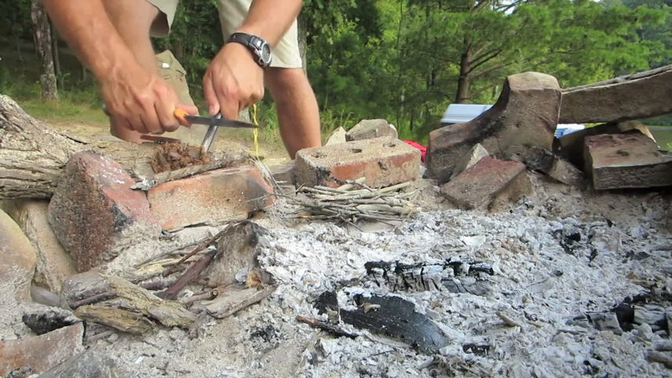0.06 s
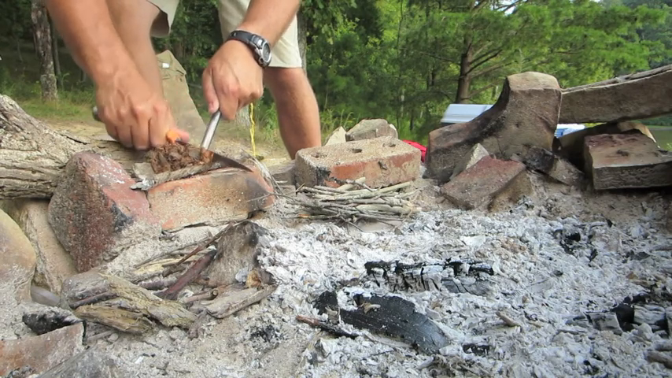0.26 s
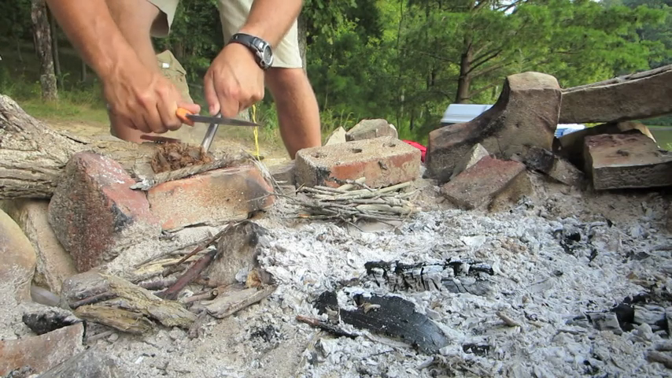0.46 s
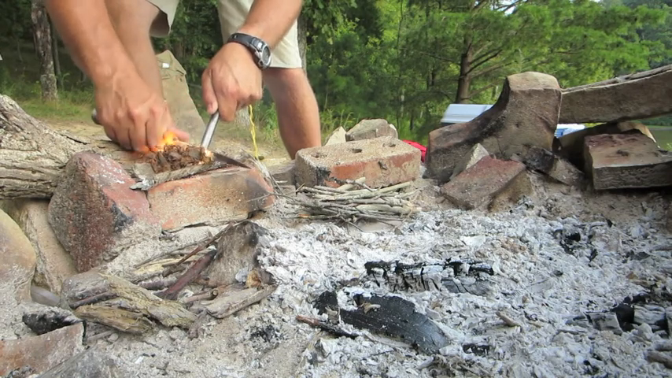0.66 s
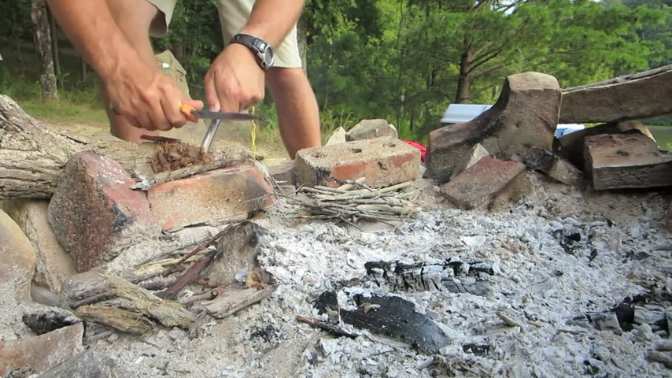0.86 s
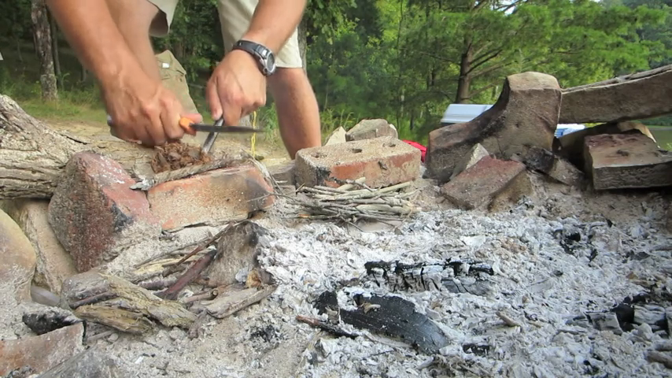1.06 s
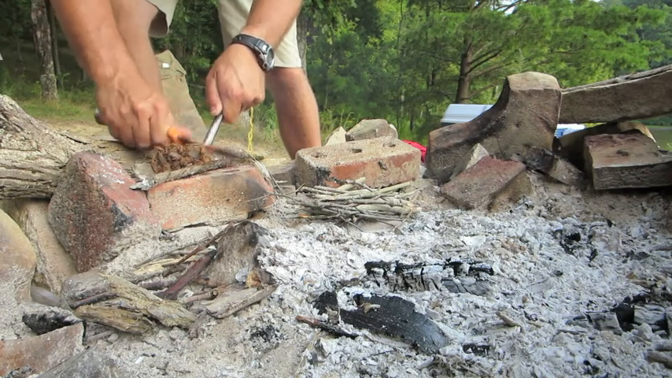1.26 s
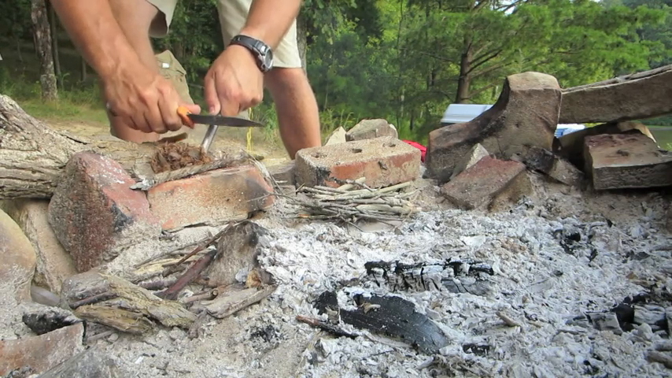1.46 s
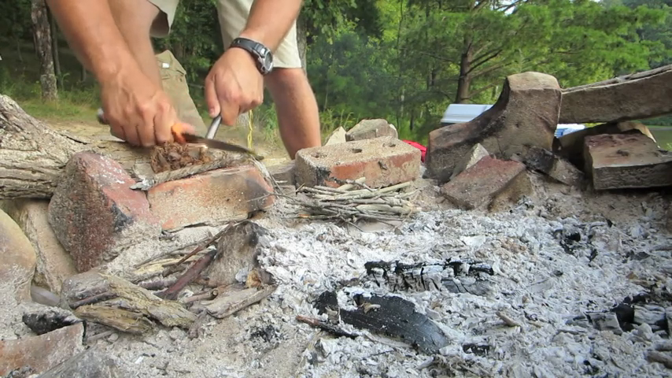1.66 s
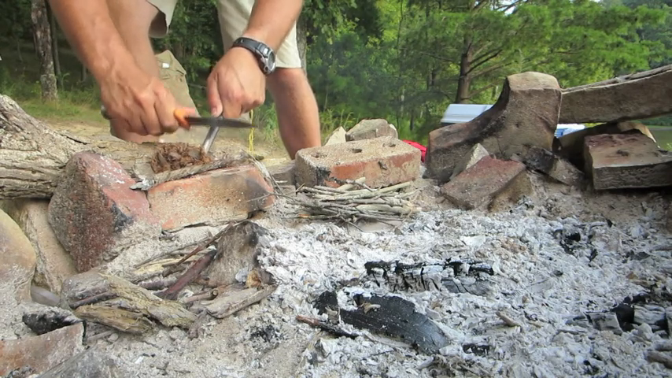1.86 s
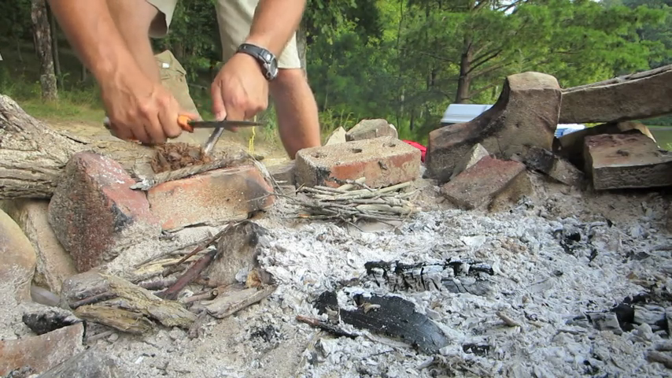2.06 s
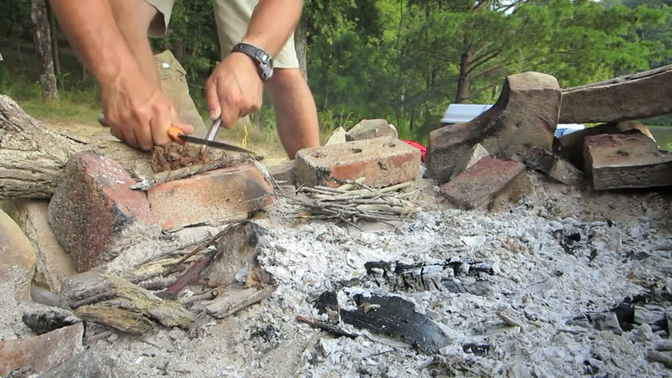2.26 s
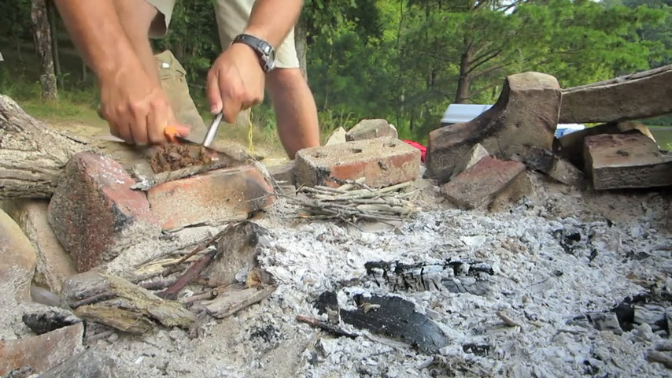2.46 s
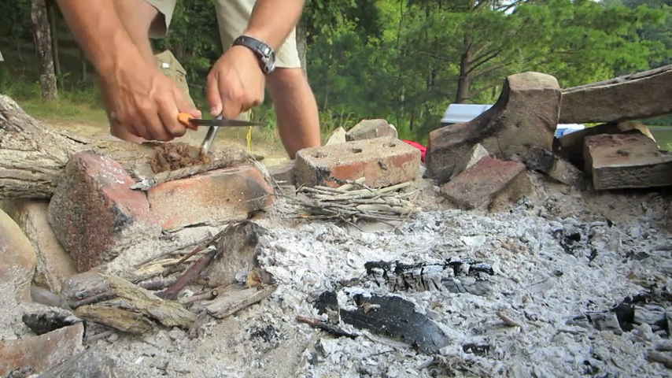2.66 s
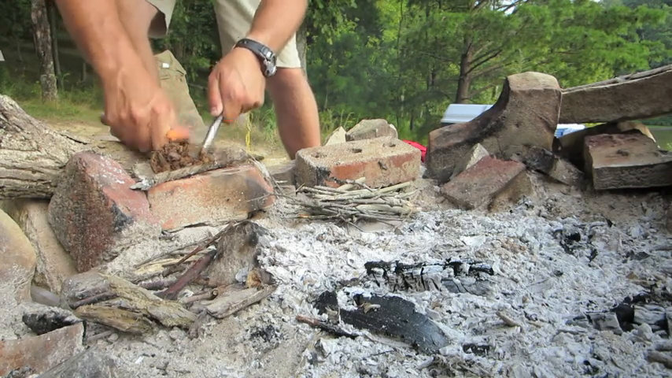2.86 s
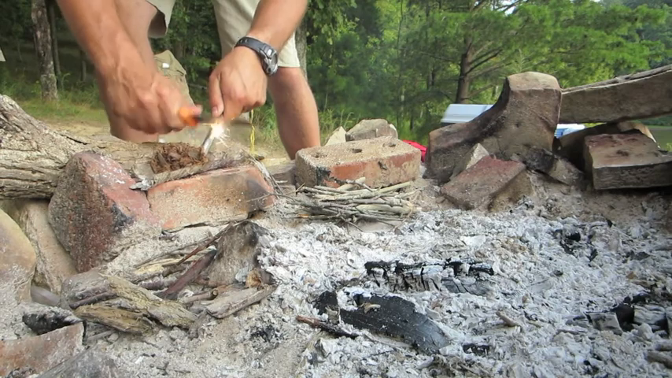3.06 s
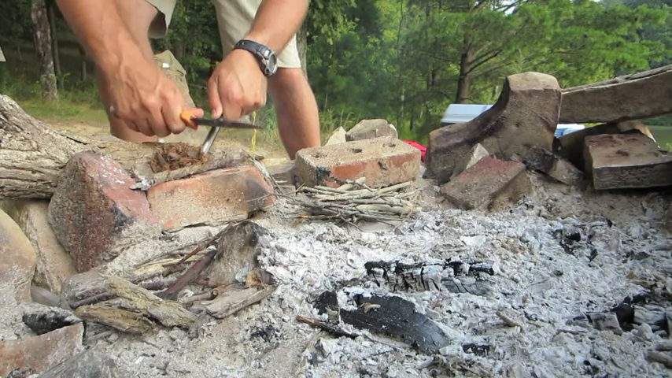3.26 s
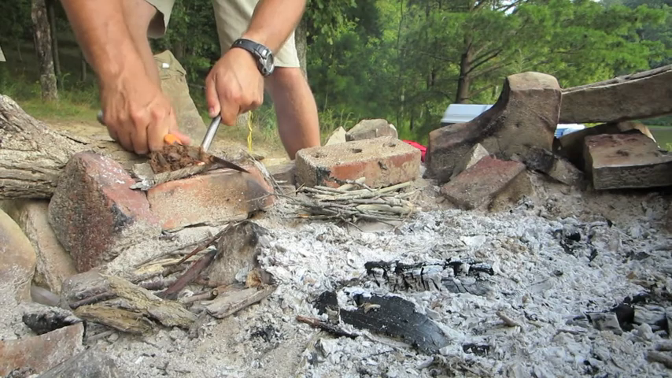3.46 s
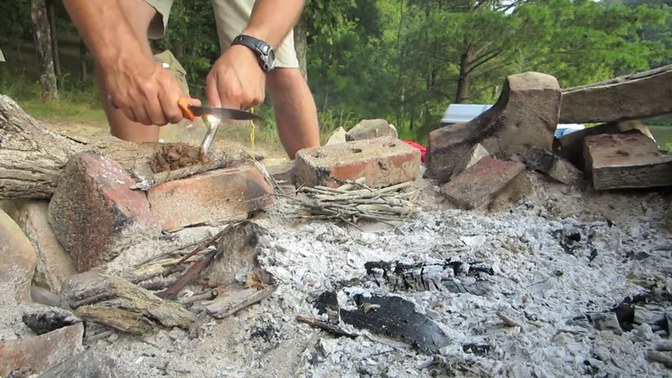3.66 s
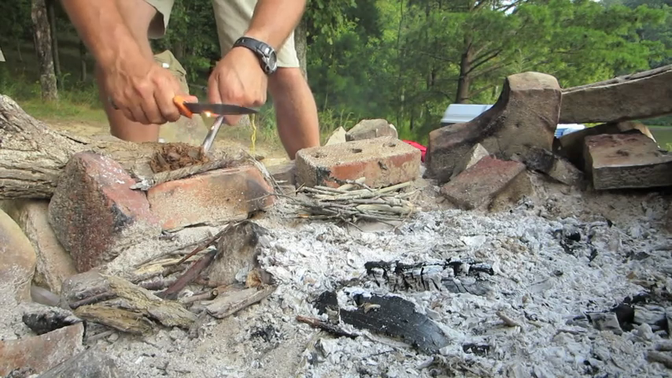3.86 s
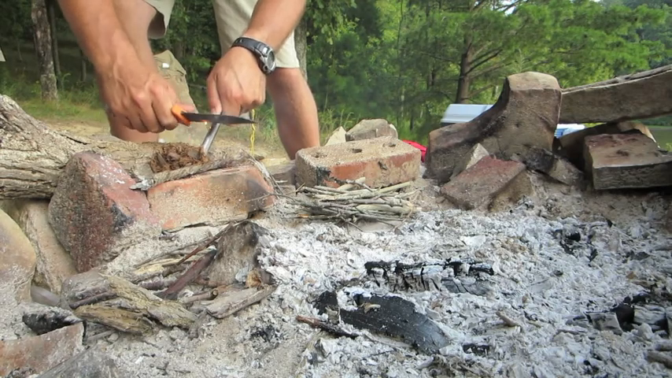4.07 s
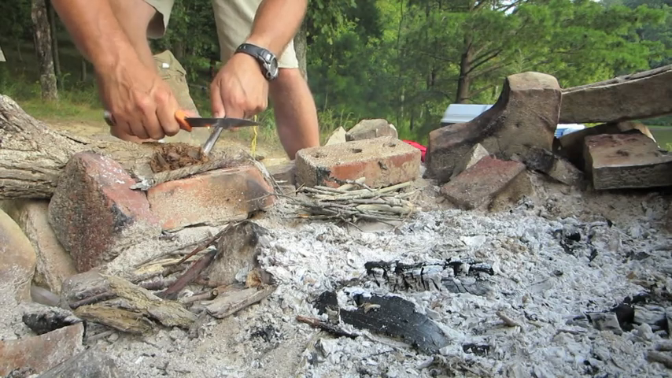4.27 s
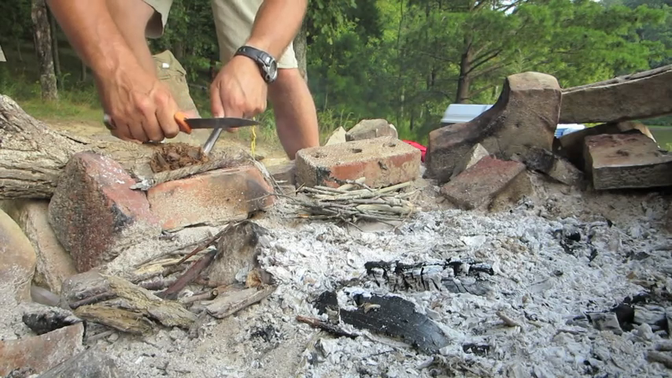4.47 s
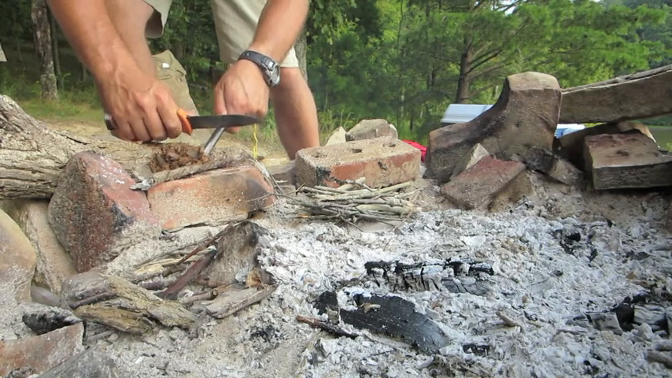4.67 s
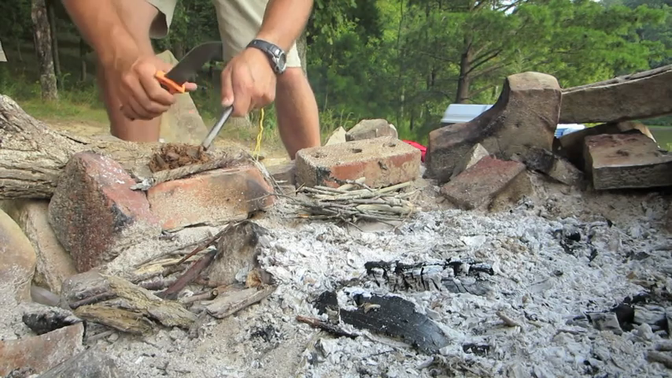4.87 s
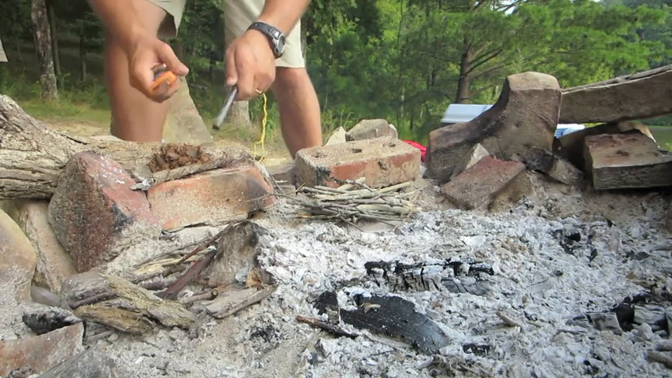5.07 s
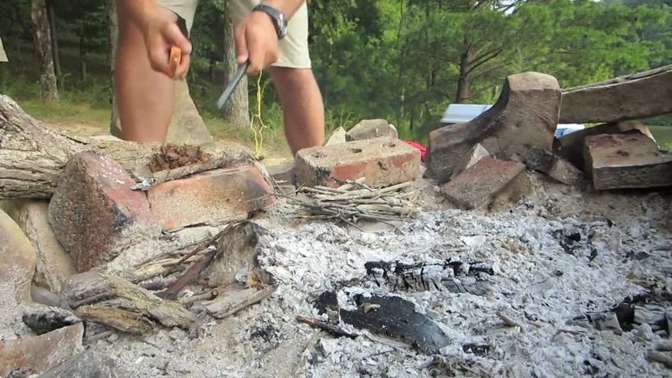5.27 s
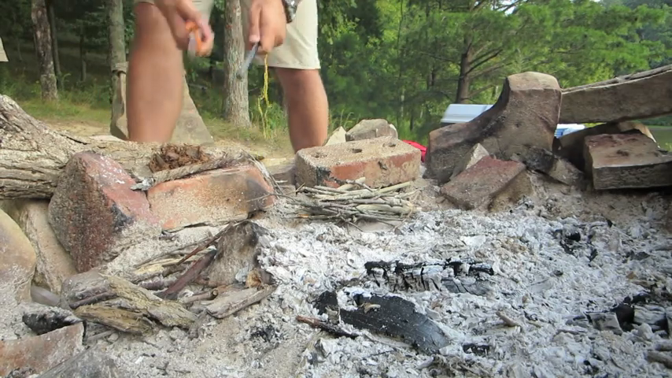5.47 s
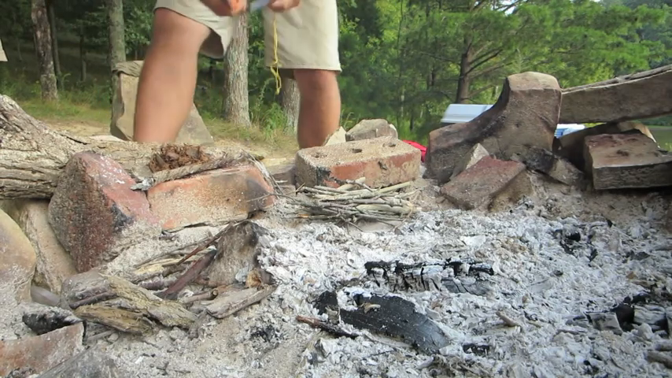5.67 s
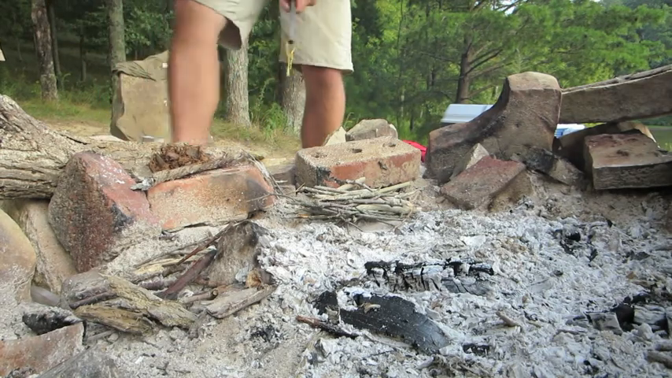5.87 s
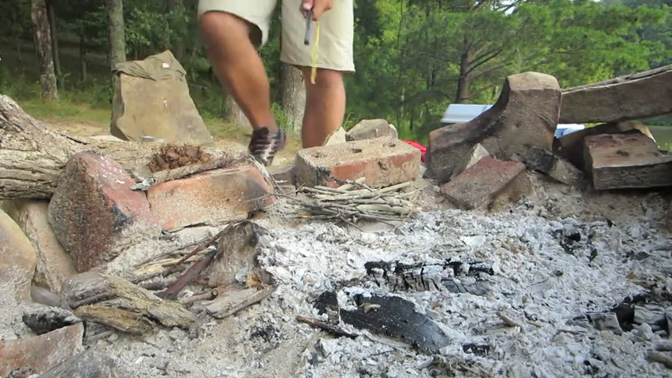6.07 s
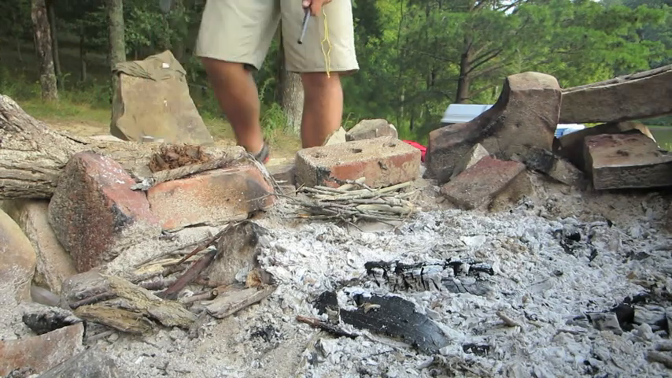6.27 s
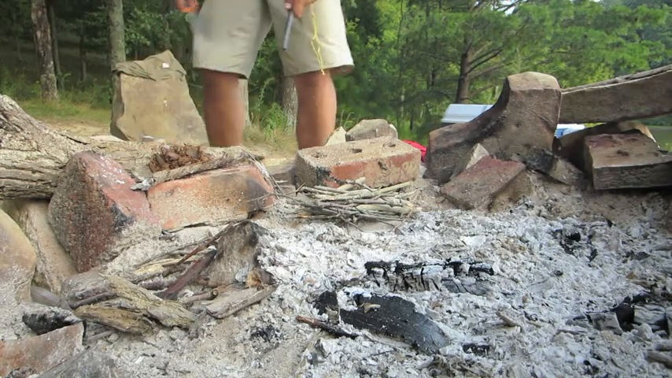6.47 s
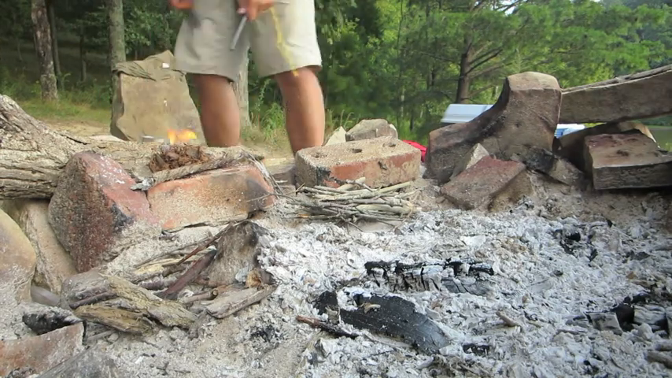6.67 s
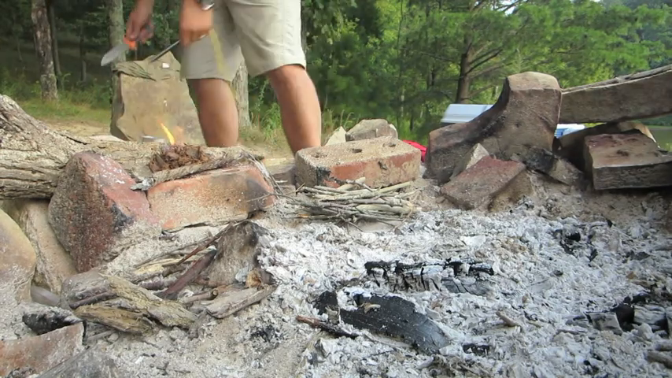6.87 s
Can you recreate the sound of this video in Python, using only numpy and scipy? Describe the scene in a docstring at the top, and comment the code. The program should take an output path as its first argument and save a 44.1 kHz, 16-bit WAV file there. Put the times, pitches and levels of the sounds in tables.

```python
"""At a stone fire ring, under trees, a knife is scraped down a fire-starter rod in seven hard strokes.
Chatter noise excites gliding blade resonances and a rasp; clumped random grains make sparks fizz and sputter.
Between strokes the blade clacks onto the rod as decaying modes; then feet step back over dry grass.
Pulsed tones and narrow-band noise make insects trill above a low outdoor rumble of filtered noise."""
import sys
import numpy as np
from scipy import signal
from scipy.fft import rfft, irfft, next_fast_len
from scipy.io import wavfile
from scipy.ndimage import map_coordinates

SR = 44100
rng = np.random.default_rng(int(sys.argv[2]) if len(sys.argv) > 2 else 0)


def file_out(sig):
    """Save sig as 16-bit WAV at sys.argv[1]."""
    # one column per channel
    cols = np.atleast_2d(sig).T
    # limit, then scale
    lim = np.clip(cols, -1, 1)
    pcm = np.round(lim * 32767).astype(np.int16)
    wavfile.write(sys.argv[1], SR, pcm)


N = 305682  # samples
TOP_HZ = 16100  # upper band limit

# Rumble of the open air. Each row: time in seconds, relative level in dB.
RUMBLE_LEVEL = [(.2, -45.5), (.3, -42), (1.0, -46.5), (3.5, -41.5), (3.8, -51), (4.45, -49), (4.7, -51.5),
                (5.3, -51.5), (5.761, -46), (5.84, -43), (5.93, -42.5), (6.01, -48), (6.25, -47),
                (6.74, -47.5), (6.93, -45.5)]
# Puffs of air on the microphone. Each row: loudest at in seconds, 20 dB rise in seconds,
# 20 dB fall in seconds, level in dB.
AIR_PUFFS = [(2.41, 0.21, 0.23, -40), (3.125, 0.088, 0.054, -32), (3.23, 0.17, 0.26, -40),
             (3.46, 0.24, 0.16, -37.5), (4.48, 0.27, 0.27, -44)]
# Spectra of the distant rumble and the leaf hiss. Each row: frequency in Hz, relative density in dB per Hz.
RUMBLE_SPECTRUM = [(12, -69), (20, -37), (27, -27.5), (88, -4.5), (146, -5), (183, -1.5), (218, 0),
                   (264, -8), (315, -7), (743, -23), (1170, -31), (1980, -120)]
LEAF_HISS_SPECTRUM = [(200, -18), (700, 0), (1300, 2.5), (2500, -4), (5000, -12), (7500, -8), (9500, -21.5),
                      (12000, -15), (16000, -22)]
# The trees' answer. Each row: frequency in Hz, 60 dB decay time in seconds.
TREE_DECAY = [(200, 0.056), (1200, 0.54), (2600, 0.32), (5000, 0.18), (12000, 0.022)]

# Hands shift their grip and brush the tinder; the knife's tip scuffs over the stone; feet and clothes swish #
# in dry grass. Each row: loudest at in seconds, 20 dB rise in seconds, 20 dB fall in seconds, # relative level
# in dB.
HAND_SWELLS = [(.475, 0.026, 0.047, -45.5), (.915, 0.033, 0.021, -44.5), (1.0, 0.054, 0.076, -44.5),
               (1.44, 0.038, 0.3, -54), (1.56, 0.085, 0.67, -50.5), (1.925, 0.026, 0.074, -46),
               (2.12, 0.72, 0.19, -51), (2.19, 0.018, 0.036, -40), (3.25, 0.61, 0.7, -52.5)]
SCUFF_SWELLS = [(2.652, 0.059, 0.073, -34), (2.702, 0.05, 0.052, -26.5), (2.74, .06, 0.14, -42)]
GRASS_SWELLS = [(5.97, 1.16, 0.75, -55), (6.213, 0.14, 0.053, -46), (6.493, 0.046, 0.044, -36),
                (6.595, 0.15, 0.033, -49), (6.742, 0.1, 0.031, -40.5)]
# Their spectra. Each row: frequency in Hz, relative density in dB per Hz.
HAND_SPECTRUM = [(100, 3), (400, 2.5), (900, 2.5), (1700, 0), (2500, -4), (4000, -9.5), (8000, -11.5),
                 (16000, -20)]
SCUFF_SPECTRUM = [(30, -6), (150, 6), (600, -4), (1200, -4), (1550, -3), (1950, 1), (2500, -10),
                  (4000, -18.5), (16000, -31.5)]
GRASS_SPECTRUM = [(150, 0), (500, 1.5), (1500, -1), (3000, 0), (6000, -5.5), (11000, -4.5), (16000, -16)]

# Modes of the slab underfoot. Each row: frequency in Hz, level in dB, 60 dB decay time in seconds.
SLAB_MODES = [(223, -19.5, 0.025), (380, -19.5, 0.027), (575, -23, 0.021), (768, -27, 0.05),
              (1226, -31, .04)]
STEP_S = 5.9325
# Short pops, knocks and snaps of sparks, stones, twigs and steps. Each row: time in seconds,
# peak of the push in dB, pitch in Hz, 60 dB decay time of the crumbling in seconds.
KNOCK_EVENTS = [(.222, -27, 1500, 0.034), (.257, -26, 705, 0.031), (.632, -24.5, 690, 0.047),
                (0.826, -27.5, 835, 0.024), (.995, -29, 2200, .03), (1.017, -31, 1200, 0.0093),
                (1.229, -25, 696, 0.016), (1.239, -20.5, 1120, .025), (1.999, -26.5, 1280, 0.018),
                (2.35, -22, 2600, 0.033), (2.389, -21.5, 920, 0.047), (2.405, -21.5, 1010, 0.021),
                (2.632, -8, 5800, .01), (2.669, -24, 1400, 0.03), (2.700, -21.5, 2100, 0.022),
                (2.768, -28, 660, 0.057), (2.797, -24, 616, 0.021), (2.948, -23, 2000, 0.037),
                (2.959, -22.5, 520, 0.031), (3.149, -21.5, 111, .03), (4.477, -37, 7000, 0.021),
                (5.328, -19, 1200, .011), (5.3288, -35, 2900, .013), (5.766, -26, 7400, 0.011),
                (5.814, -35, 280, .04), (6.116, -28, 6100, 0.02), (6.426, -29.5, 5340, 0.031),
                (6.4285, -25.5, 694, 0.03), (6.4312, -25.5, 1760, .018), (6.654, -32, 2600, .025),
                (6.674, -35, 1640, .027)]
# The free blade pings when its tip is grazed. Each row: time in seconds, level in dB,
# 60 dB decay time of the fast part in seconds.
PING_EVENTS = [(1.921, -21.5, 0.039), (2.072, -23, 0.049)]
# The blade lands on the rod. Each row: time in seconds, relative level in dB, then handle knock, main note,
# tip ring and crack in relative dB, rebound delay in seconds, rebound level in dB relative to the blow.
CLACK_EVENTS = [(0.4612, -5.5, -5, 0, 2, -5, 0.0038, -9), (.8935, -13.5, 7, 1, -5, -3.5, 0.0063, -9),
                (1.4166, -10, 0.5, 2.5, -3, -4.5, .0037, -7.5),
                (1.7459, -11, 1, -2.5, -22, -7.5, 0.0031, 0), (1.913, -21, 13, -3, 3, -13, 0.0094, 2),
                (2.184, -23, 5, 0, 5, -6, 0.0047, -2), (2.6195, -18.5, 2, -0.5, -9, 0, .0035, -17),
                (2.9303, -14, 8, 0, -12, -2.5, 0.0022, -15), (3.1406, -12.5, 1.5, -2, 1, -2.5, 0.0024, -19),
                (3.581, -23.5, -8, 8, -14, -3, 0.0038, -10), (4.0551, -12, -2, 3, 3.5, -6.5, 0.0027, -4.5)]
# Modes of knife and rod held together. Each row: frequency in Hz, relative level in dB,
# 60 dB decay time in seconds before the hands' choking.
TOOL_MODES = [(494, -17, 0.019), (680, -16, 0.025), (1122, -7.5, 0.024), (1400, -4, 0.02), (1856, -6, .009),
              (2580, 1.5, 0.0115), (2830, -2, 0.0074), (3170, 0, 0.0066), (3504, -3, .016),
              (4170, -9, 0.0063), (5480, -11, 0.0053)]

# The edge bites, pressure builds until the shavings catch, then eases. Each row: start in seconds, time until
# they catch in seconds, time easing off in seconds, first bite in dB relative to the peak, then grinding,
# spark fizz and sputter in relative dB, flare at in seconds, relative level of the lowest blade mode in dB.
STROKES = [(.166, 0.076, 0.17, -8, -35, -37, -37, 0.24, 5),
           (0.593, 0.098, 0.14, -8, -34, -35, -35.5, 0.64, 4),
           (1.109, 0.12, 0.11, -10, -33, -37.5, -36, 1.19, 1.5),
           (1.61, 0.14, 0.053, -7.5, -33, -37, -37, 1.67, -4),
           (2.228, 0.15, 0.18, -5, -36, -40, -37.5, 2.402, 7),
           (2.853, 0.069, 0.13, -7, -32.5, -35.5, -33.5, 2.945, -9),
           (3.305, 0.18, 0.12, -9, -33.5, -38, -37.5, 3.64, -15)]
# The edge skips and bites again after the main stroke. Each row: start in seconds, length in seconds,
# then grinding, spark fizz and sputter in relative dB.
EDGE_SKIPS = [(0.286, 0.012, -44, -47, -40.5), (0.528, 0.0077, -46.5, -48.5, -53),
              (0.757, 0.0083, -51, -43, -47), (1.321, 0.021, -39.5, -41.5, -42),
              (1.792, 0.011, -44.5, -65, -43), (1.857, 0.0076, -40.5, -48, -50),
              (1.936, 0.043, -47, -52, -50), (3.046, 0.063, -40.5, -40, -43.5),
              (3.616, 0.037, -45.5, -39, -43), (3.67, 0.086, -47, -44.5, -50.5)]
# The blade slides lightly along the rod between strokes. Each row: loudest at in seconds,
# 20 dB rise in seconds, 20 dB fall in seconds, level in dB.
LIGHT_SLIDES = [(0, .02, 0.03, -39), (.15, 0.096, 0.044, -46.5), (1.0, 0.049, 0.046, -41),
                (1.05, 0.039, 0.031, -39.5), (1.6, 0.046, 0.024, -47)]
# A light touch is duller. Each row: frequency in Hz, relative gain in dB.
LIGHT_COLOUR = [(1500, 7.5), (2600, 7), (4200, -8)]
# Resonances of the pressed blade. Each row: frequency in Hz, width in Hz, relative level in dB,
# share by which it rises in mid bite, share by which it has sunk when the shavings catch.
BLADE_MODES = [(1558, 137, -6, 0.0062, 0.063), (2507, 220, -1, 0.013, 0.0092), (3010, 420, -2.5, .05, 0.16),
               (3786, 400, 0, 0.066, 0.21), (4007, 300, -3.5, 0.03, 0.065)]
# Spectra of the rasp, the spark fizz and the sputter. Each row: frequency in Hz, relative density in dB per Hz.
RASP_SPECTRUM = [(300, -12), (1000, -7), (2000, -3), (3500, -3.5), (5000, -6.5), (9000, -19.5),
                 (16000, -42)]
FIZZ_SPECTRUM = [(1500, -24), (3400, -22), (5000, -0.5), (6500, -1.5), (8000, 3), (9000, -1.5), (10000, 2),
                 (12000, 1.5), (13500, -1), (16000, -28)]
SPUTTER_SPECTRUM = [(50, -8), (130, 7), (300, -0.5), (550, 7), (800, -5.5), (1300, -5), (2200, -22.5),
                    (6000, -25)]

ATTACK_S, RELEASE_S = 0.036, 0.17  # the edge meets and leaves the rod
SKIP_ATTACK_S, SKIP_RELEASE_S = 0.016, 0.097
EASED_DB = -11.5  # pressure at the end of a stroke, relative to its peak
SILENT_DB = -43  # change of level over one attack or release time
FIZZ_GROWS = 1.12  # dB of sparks for each dB of pressure
# the sputter flares as the shavings catch, over a weaker one tied to the pressure
FLARE_RISE_S, FLARE_FALL_S, SMOULDER_DB = 0.027, 0.061, -2


def amp(db):
    """Level to amplitude: 20 dB is a factor of ten."""
    return 10 ** (np.asarray(db) / 20)


def unit(x):
    """Normalisation: x at an rms of 1."""
    return x / np.sqrt(np.mean(x ** 2) + 1e-20)


def along(points, hz):
    """Interpolation of (Hz, value) points on a logarithmic frequency axis."""
    f, v = np.transpose(points)
    return np.interp(np.log(hz + 1), np.log(f), v)


def wobble(rate):
    """Random modulation: a smooth curve through rate random knots a second."""
    knots = rng.standard_normal(int(N * rate / SR) + 4)
    return map_coordinates(knots, [np.arange(N) * rate / SR])


def filtered(x, response):
    """Linear filtering: the spectrum of x times a complex response of frequency."""
    n = x.shape[-1]
    m = next_fast_len(n + 8192)
    return irfft(rfft(x, m) * response(np.fft.rfftfreq(m, 1 / SR)), m)[..., :n]


def coloured(x, spectrum):
    """Spectral shaping: x given a spectrum, at an rms of 1."""
    return unit(filtered(x, lambda hz: amp(along(spectrum, hz))))


def resonance(f, hz, width):
    """Damped resonator: response at f of one mode at hz."""
    return 1j * f * width / (hz * hz - f * f + 1j * f * width)


def grains(rate, spread_db, clump_db, clump_rate):
    """Shot noise: tiny fractures, rate a second on average, of uneven size that swell in clumps."""
    hits = (rng.random(N) < rate / SR) * rng.choice([-1, 1], N)
    size_db = spread_db * rng.standard_normal(N) + clump_db * wobble(clump_rate)
    return hits * amp(size_db)


def swells(rows):
    """Exponential envelopes: gains that change by 20 dB in each rise or fall time, summed in power."""
    t = np.arange(N) / SR
    power = sum(amp(db - 20 * np.maximum((s - t) / rise, (t - s) / fall)) ** 2 for s, rise, fall, db in rows)
    return np.sqrt(power)


def add(track, s, sound):
    """Superposition: mix a sound into a track at time s."""
    part = track[..., max(round(s * SR), 0):][..., :sound.shape[-1]]
    part += sound[..., :part.shape[-1]]


def outdoors():
    """Diffuse field: low distant rumble, faint motor hum, leaf hiss and puffs of air, mostly filtered noise."""
    noise = lambda: rng.standard_normal((2, N))
    # the ears differ more as the waves get shorter
    apart = filtered(noise(), lambda f: np.minimum(f / 1200, 1))
    rumble_db = np.interp(np.arange(N) / SR, *np.transpose(RUMBLE_LEVEL)) + 2 + 1.7 * wobble(6.1)
    rumble = amp(rumble_db) * coloured(rng.standard_normal(N) + apart, RUMBLE_SPECTRUM)
    hiss = amp(-57.5) * coloured(0.51 * rng.standard_normal(N) + noise(), LEAF_HISS_SPECTRUM)
    hum_turns = np.cumsum(100.5 + 1.34 * wobble(5)) / SR
    hum = amp(-54.0 + 3.1 * wobble(4.03)) * np.sin(2 * np.pi * hum_turns)
    puff_spectrum = [(10, -45), (25, -25), (50, -5.5), (95, -1.5), (200, -8.0), (600, -62), (3000, -86)]
    puffs = swells(AIR_PUFFS) * coloured(rng.standard_normal(N), puff_spectrum)
    return rumble + hiss + hum + puffs


def buzz(hz, width_hz):
    """Scattering by trees: a narrow band of insect song, independent at each ear."""
    return unit(filtered(rng.standard_normal((2, N)), lambda f: resonance(f, hz, width_hz) ** 2))


def insects(droop_hz=65):
    """Amplitude and frequency modulation: fast drooping pulses, a high chorus and a lower, swelling insect."""
    t = np.arange(N) / SR
    beat = 2 * np.pi * 21.67 * (t - 4.349)  # 21.67 pulses a second
    pulse = (.5 + .5 * np.cos(beat)) ** 2
    wing_hz = 8460 - droop_hz * np.sin(beat) + 45 * wobble(230)
    wing = np.sin(2 * np.pi * np.cumsum(wing_hz) / SR)
    voice = unit(wing + buzz(8460, 140) / 2)
    trill = amp(-57.5 + 1.6 * wobble(15)) * pulse * voice * amp([[3], [-3]])
    chorus = amp(-63) * buzz(8230, 467) * amp([[1.5], [-1.5]])
    swell = .5 + .5 * np.cos(2 * np.pi * 4.15 * (t - 4.61))  # 4.15 swells a second
    lower = amp(-62) * (0.39 + 0.54 * swell) * buzz(6736, 250)
    return trill + chorus + lower


def rustling():
    """Friction noise: hands rub, the knife's tip scuffs stone and feet brush dry grass, each as coloured
    grains."""
    rub = coloured(grains(rate=3500, spread_db=1.5, clump_db=4.0, clump_rate=72), HAND_SPECTRUM)
    hands = swells(HAND_SWELLS) * amp(5) * rub
    scrape = coloured(grains(rate=1800, spread_db=3.0, clump_db=3.0, clump_rate=180), SCUFF_SPECTRUM)
    scuff = swells(SCUFF_SWELLS) * scrape
    swish = coloured(grains(rate=5000, spread_db=5.5, clump_db=3.0, clump_rate=160), GRASS_SPECTRUM)
    feet = swells(GRASS_SWELLS) * swish
    return hands + scuff + feet


def footfall(attack_s=0.00059):
    """Modal impact: a heel on a loose slab excites its damped modes in a short hollow thump."""
    out, t = np.zeros(N), np.arange(SR // 5) / SR
    thump = np.zeros(len(t))
    for k, (hz, db, t60) in enumerate(SLAB_MODES):
        thump += (-1) ** k * amp(db - 60 * t / t60) * np.sin(2 * np.pi * hz * t)
    add(out, STEP_S, thump * (1 - np.exp(-t / attack_s)))
    return out


def knocks(width=1.0, crumble=0.15, softness=1.47):
    """Impulse response: one soft push and a short crumbling excite a broad resonance."""
    out, t = np.zeros(N), np.arange(SR // 10) / SR
    for s, db, hz, t60 in KNOCK_EVENTS:
        crumb_gain = crumble * np.sqrt(hz / 3000) * amp(-60 * t / t60) * (1 - np.exp(-t * hz / 2))
        crumbs = crumb_gain * rng.standard_normal(len(t))
        rung = filtered(np.array([t == 0, crumbs]), lambda f: resonance(f, hz, width * hz))
        soften = signal.butter(4, min(softness * hz, TOP_HZ), fs=SR, output="sos")
        push, tail = signal.sosfilt(soften, rung)
        add(out, s, amp(db) * (push + tail) / np.abs(push).max())
    return out


def pings(blade_hz=3160, linger_db=-27, linger_t60=0.23):
    """Two-stage decay: the one clear mode of the free blade drops fast, then lingers faintly."""
    out, t = np.zeros(N), np.arange(SR // 4) / SR
    for s, db, t60 in PING_EVENTS:
        fade = amp(-60 * t / t60) + amp(linger_db - 60 * t / linger_t60)
        attack = 1 - np.exp(-t / 0.00078)
        add(out, s, amp(db) * fade * attack * np.sin(2 * np.pi * blade_hz * t))
    return out


def clacks(attack_s=0.000097, ring_db=10, crack_t60=0.0066, choke_s=0.025):
    """Damped impact: steel cracks onto the rod and rebounds once; the hands choke its modes at once."""
    out, t = np.zeros(N), np.arange(SR // 20) / SR
    hz, mode_db, t60 = np.transpose(TOOL_MODES)[:, :, None]
    phase = np.pi * np.arange(len(hz))[:, None] / 2
    decay_db = -60 * (t / t60 + (t / choke_s) ** 2)
    grit_spectrum = [(300, 3.5), (4000, 8.5), (7000, -5.5), (12000, -4.5), (16000, -27)]
    for s, db, knock_db, note_db, tip_db, crack_db, rebound_s, rebound_db in CLACK_EVENTS:
        # where the blade lands shares the blow between the handle's low modes, its main note
        # and the tip's high modes
        place_db = np.select([hz < 2000, hz < 2700, hz > 3380], [knock_db, note_db, tip_db])
        for delay, contact_db in [(0, 0), (rebound_s, rebound_db)]:
            # each contact shifts the modes a little in level and pitch
            level_db = mode_db + place_db + rng.standard_normal(hz.shape)
            size = amp(level_db + decay_db) * (1 - np.exp(-t / attack_s))
            pitch = hz * (1 + .02 * rng.standard_normal(hz.shape))
            ring = np.sum(size * np.sin(2 * np.pi * pitch * t + phase), axis=0)
            ring = amp(ring_db) * ring / np.linalg.norm(ring)
            grit = coloured(rng.standard_normal(len(t)), grit_spectrum)
            crack = grit * amp(crack_db - 60 * t / crack_t60)
            add(out, s + delay, amp(db + contact_db) * (ring + crack))
    return out


def gate(start, length, attack, release):
    """Contact envelope: decibels that rise linearly, hold at zero and fall away."""
    t = np.arange(N) / SR
    return SILENT_DB * np.maximum(0, np.maximum((start - t) / attack, (t - start - length) / release))


def effort():
    """Force control: the hand's pressure sets the gains of grinding, fizz and sputter."""
    t = np.arange(N) / SR
    grind, fizz, sputter = np.zeros((3, N))
    for s, build, ease, bite_db, grind_db, fizz_db, sputter_db, flare, _ in STROKES:
        catch = s + build
        pressure_db = np.interp(t, [s, catch, catch + ease], [bite_db, 0, EASED_DB])
        pressure_db += gate(s, build + ease, ATTACK_S, RELEASE_S)
        grind += amp(grind_db + pressure_db)
        fizz += amp(fizz_db + FIZZ_GROWS * pressure_db)
        smoulder = amp(sputter_db + SMOULDER_DB + pressure_db) * np.clip((t - s) / build, 0, 1) ** 2
        flare_up = swells([(flare, FLARE_RISE_S, FLARE_FALL_S, sputter_db)])
        sputter += np.hypot(flare_up, smoulder)
    skips = np.zeros((3, N))
    for s, length, *levels_db in EDGE_SKIPS:
        skips += amp(np.array(levels_db)[:, None] + gate(s, length, SKIP_ATTACK_S, SKIP_RELEASE_S))
    return np.hypot([grind, fizz, sputter], skips)


def sliding(x, hz, width_hz):
    """Heterodyne filtering: x through a resonance whose centre moves, at an rms of 1."""
    turn = np.exp(2j * np.pi * np.cumsum(hz) / SR)
    lowpass = signal.butter(2, width_hz / 2, fs=SR)
    return unit(np.real(turn * signal.lfilter(*lowpass, x / turn)))


def blade_ring(wander=0.016, wander_rate=45, overrun=1.22, patchy_db=2.5):
    """Forced vibration: chatter rings modes that arch with each bite, sink along the rod and waver with grip."""
    t = np.arange(N) / SR
    start, build, *_, low_db = np.transpose(STROKES)
    stroke = np.abs(t[:, None] - start).argmin(axis=1)  # the stroke that starts nearest in time
    travel = np.clip((t - start[stroke]) / build[stroke], 0, overrun)
    arch = np.sin(np.pi * np.minimum(travel, 1))
    chips = grains(rate=3500, spread_db=3.5, clump_db=1.5, clump_rate=240)
    ring = np.zeros(N)
    for k, (hz, width, db, bend, sink) in enumerate(BLADE_MODES):
        level_db = db + (k == 0) * low_db[stroke] + patchy_db * wobble(wander_rate)
        centre_hz = hz * (1 + bend * arch - sink * travel ** 2 + wander * wobble(wander_rate))
        ring += amp(level_db) * sliding(chips, centre_hz, width)
    return unit(ring)


def scraping(ring_share=0.54, late_share=0.068, fade_s=0.021, unlit_db=-0.5):
    """Friction-driven vibration: the edge chatters and rings the blade; shavings ignite, fizz and sputter."""
    t = np.arange(N) / SR
    grind, fizz, sputter = effort()
    # the blade rings clearly until the shavings catch, then a broad rasp takes over
    biting = np.zeros(N)
    for s, build, *_ in STROKES:
        biting += (t > s - ATTACK_S) * (.5 - .5 * np.tanh((t - s - build) / fade_s))
    share = np.clip(late_share + ring_share * biting, 0, 1)
    rasp = coloured(grains(rate=3000, spread_db=3.5, clump_db=3, clump_rate=220), RASP_SPECTRUM)
    edge = grind * (amp(2.0) * np.sqrt(share) * blade_ring() + amp(1.0) * np.sqrt(1 - share) * rasp)
    crackle = coloured(grains(rate=8000, spread_db=3.5, clump_db=2.5, clump_rate=360), FIZZ_SPECTRUM)
    sparks = fizz * amp(3.5 + unlit_db * biting) * crackle
    spitting = coloured(grains(rate=1800, spread_db=2.5, clump_db=3.5, clump_rate=73), SPUTTER_SPECTRUM)
    flare = sputter * amp(2.5) * spitting
    slides = swells(LIGHT_SLIDES) * coloured(blade_ring() + rasp, LIGHT_COLOUR)
    return edge + sparks + flare + slides


def scattered(x, t60, count=90):
    """Time-varying scattering: dense short reflections that keep changing as the hands move."""
    out, hop, t = np.zeros((2, N)), N // count, np.arange(SR // 30) / SR
    padded = np.pad(x, (hop, 2 * hop))
    for start in range(0, N, hop):
        piece = padded[start:start + 2 * hop] * signal.get_window("hann", 2 * hop)
        paths = rng.standard_normal((2, len(t))) * amp(-60 * t / t60)
        paths = paths / np.linalg.norm(paths[0])
        add(out, start / SR, signal.fftconvolve(piece[None], paths, axes=1))
    return np.pad(out[:, hop:], ((0, 0), (0, hop)))  # undo the leading padding


def fire_ring(x, lead_s=4.3e-5, stones_t60=0.029, trees_db=-26):
    """Interaural cues and reflection: sound a little to the left, scattered by stones, answered by trees."""
    # left ear over right ear: (Hz, dB)
    left_db = [(120, -3.4), (250, 0), (600, 1.8), (1200, 1.8), (2600, 0.0), (4500, 1.5), (8000, 2.5),
               (12000, 2.5), (15000, 0.0)]
    stones_db = [(150, -40), (600, -7.0), (2500, -3.0), (5000, -2.0), (10000, 0.5), (16000, -6)]
    # the left ear leads by lead_s
    direct = filtered(x, lambda f: np.exp(1j * np.pi * f * lead_s * np.array([[1], [-1]])))
    stones = filtered(scattered(x, stones_t60), lambda f: amp(along(stones_db, f)))
    near = filtered(direct + stones, lambda f: amp(along(left_db, f) * np.array([[.5], [-.5]])))
    # noise that decays at its own rate in each band
    hz, age, z = signal.stft(rng.standard_normal((2, SR // 2)), SR, nperseg=256)
    decay = amp(-60 * age / along(TREE_DECAY, hz)[:, None])
    tail = signal.istft(z * decay, SR, nperseg=256)[1]
    trees = signal.fftconvolve(x[None], tail / np.linalg.norm(tail[0]), axes=1)[:, :N]
    return near + amp(trees_db) * trees


def scene():
    """Superposition of the work at the fire ring and the open air around it."""
    work = rustling() + footfall() + knocks() + pings() + clacks() + scraping()
    return outdoors() + insects() + fire_ring(work)


def record(dry):
    """Band limiting: an ideal low-pass keeps nothing from TOP_HZ upward."""
    return filtered(dry, lambda hz: hz < TOP_HZ)


dry = scene()
out = record(dry)
file_out(out)
```